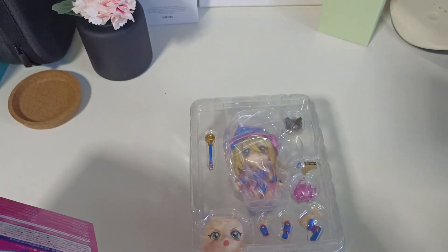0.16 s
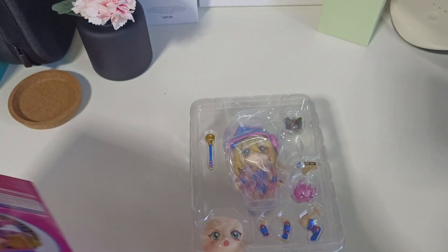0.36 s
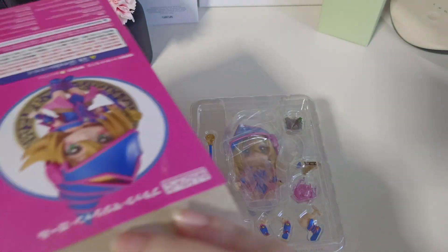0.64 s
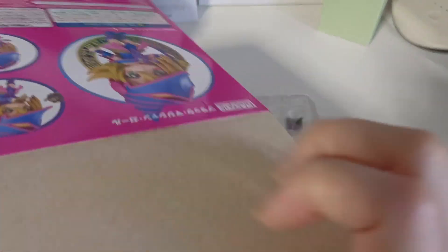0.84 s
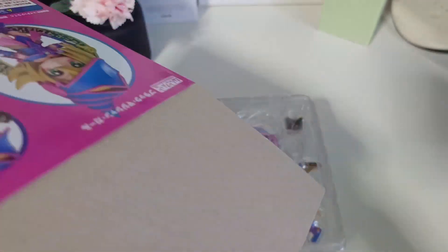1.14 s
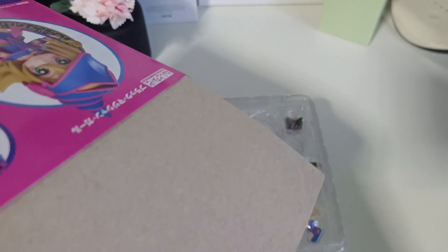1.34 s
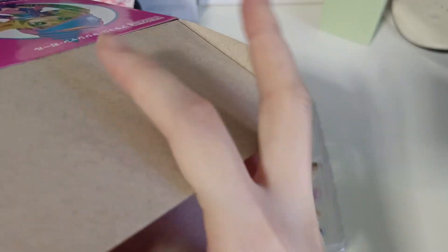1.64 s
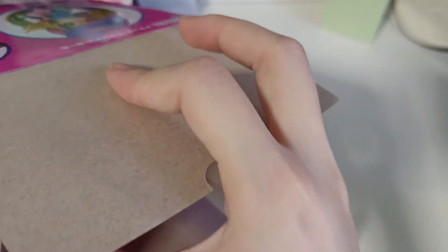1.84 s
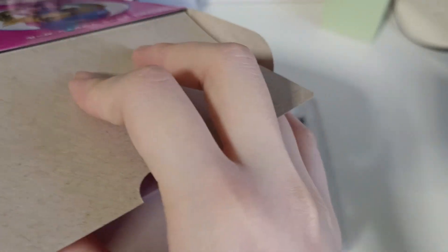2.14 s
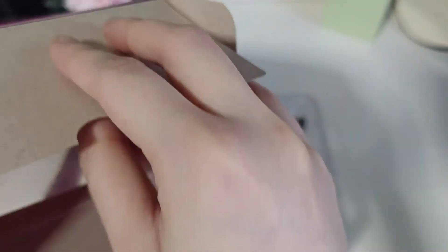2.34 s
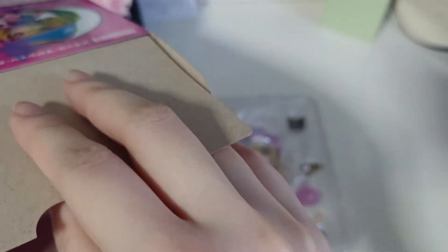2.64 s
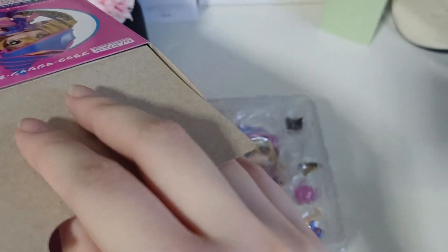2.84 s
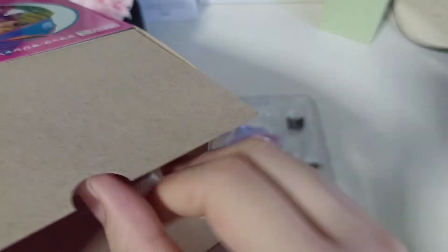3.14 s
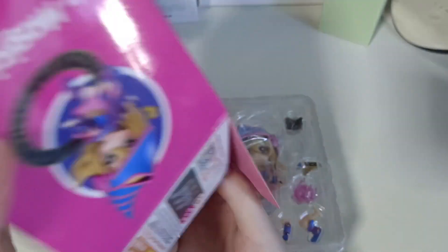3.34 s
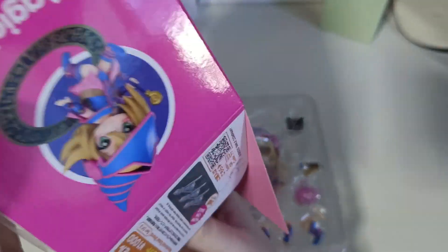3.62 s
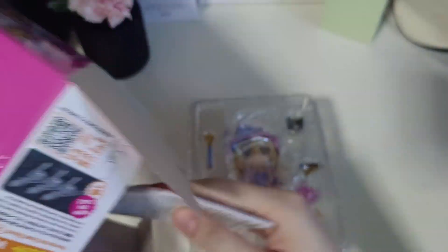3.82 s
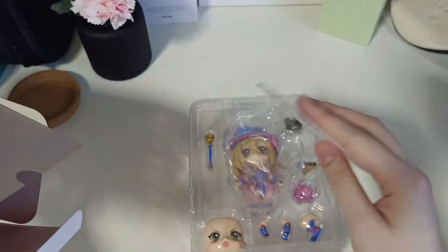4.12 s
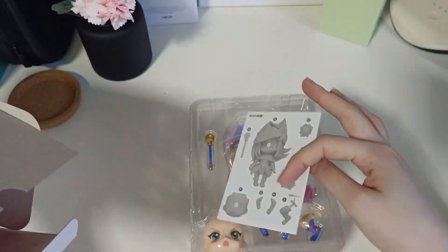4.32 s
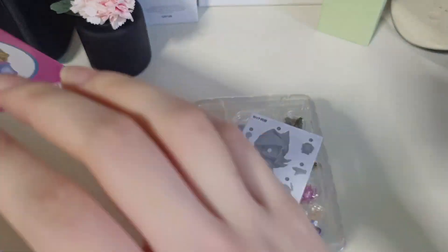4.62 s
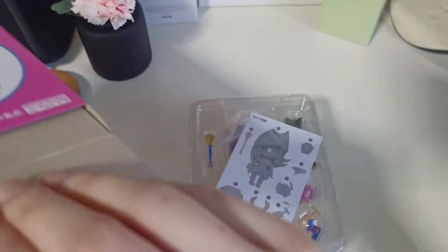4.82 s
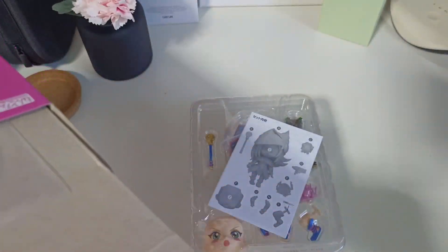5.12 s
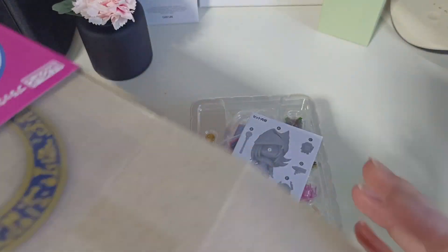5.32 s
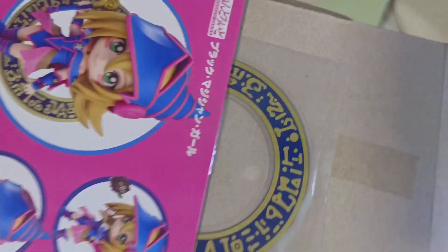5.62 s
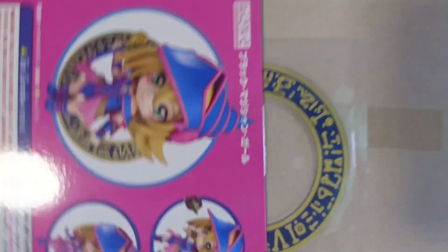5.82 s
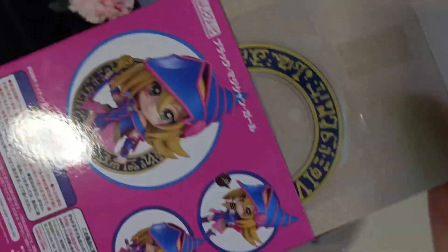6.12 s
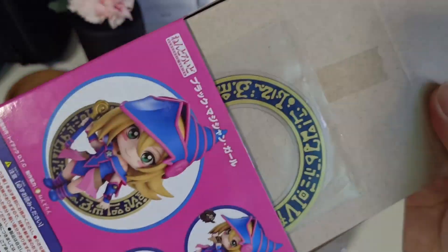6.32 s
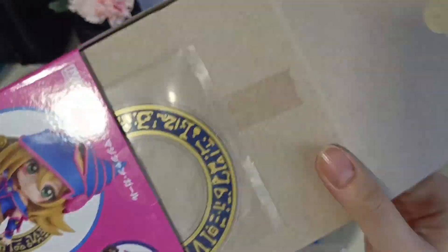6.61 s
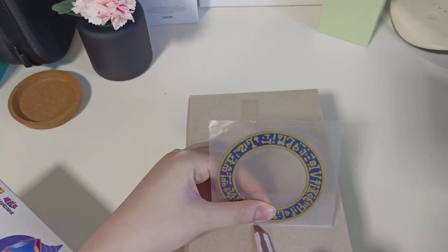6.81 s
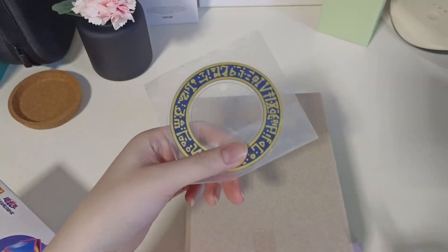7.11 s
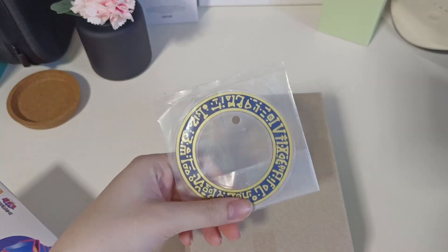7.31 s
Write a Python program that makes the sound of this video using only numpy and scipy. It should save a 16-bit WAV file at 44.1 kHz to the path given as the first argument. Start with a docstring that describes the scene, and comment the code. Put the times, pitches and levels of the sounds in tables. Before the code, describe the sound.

Very close stereo handling of a hollow cardboard box in a small, quiet room. From 0 to 0.9 s, fingers rub dry card at the right with a faint squeak, light swishes and dull boxy thumps. From 0.9 to 1.25 s, bright snaps and scuffs cluster tightly. Uneven scraping and juddering scuffs continue to 3 s, strongest near 2.7, then a hard snap at 3.03. A short squeak at 3.35 leads to a low bump at 3.55 and more rubbing, now in front, with squeaks near 3.8-4. It quietens; a sheet slaps flat at 4.47. A squeak at 4.7 precedes long scrapes and papery fizz to 5.15. Snaps and low thumps return at 5.55-5.85, with film swishing around 6.1 and a knock at 6.29. Sparse rubs, a snap at 6.94 and scuffs to 7.1 fade into soft room air and a barely audible high whine.

```python
"""Fingers and flaps scrape a hollow cardboard box as hands turn it over a desk: uneven slips excite the card.
Edges snap and scuff as short bursts that ring the card, and the box booms at each grip as a damped tone.
Paper and film fizz, sliding edges squeak as narrow noise, and a sheet slaps flat.
Behind them are low lumps of noise, soft room air and a faint high whine. The small room echoes quietly."""
import sys
import numpy as np
from scipy import signal
from scipy.fft import rfft, irfft, next_fast_len
from scipy.io import wavfile
from scipy.ndimage import uniform_filter1d, map_coordinates

SR = 44100
rng = np.random.default_rng(int(sys.argv[2]) if len(sys.argv) > 2 else 0)


def wav_out(sig):
    """Save sig, one row per channel (or a flat mono array), as 16-bit PCM at SR to the path in sys.argv[1]."""
    wavfile.write(sys.argv[1], SR, np.round(np.clip(np.atleast_2d(sig).T, -1, 1) * 32767).astype(np.int16))


N = 328986  # length in samples


def amp(db):
    """Turn a level in dB into a gain."""
    return 10 ** (np.asarray(db) / 20)


def unit(x):
    """Scale x to an rms of 1."""
    return x / np.sqrt(np.mean(x ** 2) + 1e-20)


def along(points, hz):
    """Read a table of (pitch_hz, value) at any pitch, on a log pitch axis."""
    f, value = np.transpose(points)
    return np.interp(np.log(hz + 1), np.log(f + 1), value)


def level_curve(rows):
    """Join (time_s, level_db) points into one level per sample."""
    time_s, level_db = np.transpose(rows)
    return np.interp(np.arange(N) / SR, time_s, level_db)


def wobble(rate):
    """Draw a smooth random curve through this many random points a second."""
    knots = rng.standard_normal(int(N * rate / SR) + 4)
    return map_coordinates(knots, [np.arange(N) * rate / SR])


def filtered(x, response):
    """Filter x by a response given as a function of frequency."""
    n = x.shape[-1]
    m = next_fast_len(n + 8192)  # room for the ringing to die away
    return irfft(rfft(x, m) * response(np.fft.rfftfreq(m, 1 / SR)), m)[..., :n]


def shaped(x, spectrum):
    """Give x a spectrum of (pitch_hz, level_db) points."""
    return filtered(x, lambda f: amp(along(spectrum, f)))


def ringing(modes, f):
    """Add up resonances, each a pitch that rings when pushed; their signs alternate."""
    total = 0
    for k, (hz, width, db) in enumerate(modes):
        total = total + (-1) ** k * amp(db) * 1j * f * width / (hz * hz - f * f + 1j * f * width)
    return total


def slips(per_second, spread_db, smooth):
    """Stick-slip: random catches of uneven size, mixed with a share of smooth noise."""
    caught = rng.random(N) < per_second / SR
    catch = caught * amp(spread_db * rng.exponential(size=N)) * rng.standard_normal(N)
    return np.sqrt(1 - smooth) * unit(catch) + np.sqrt(smooth) * rng.standard_normal(N)


def drifting(x, patchy_db):
    """The bending card shifts its strong frequencies from moment to moment."""
    z = signal.stft(x, nperseg=256)[2]
    patches = uniform_filter1d(rng.standard_normal(z.shape), 2, 0)  # blur over frequency
    patches = uniform_filter1d(patches, 10, 1)  # blur over time
    return signal.istft(z * amp(patchy_db * unit(patches)), nperseg=256)[1][:N]


def pressing(rows, hush_db=-11):
    """Gain of (start_s, length_s, level_db) strokes: each swells, holds, fades and leaves a faint touch."""
    power = np.zeros(N + SR)
    for start_s, length_s, db in rows:
        progress = np.linspace(0, 1, round(length_s * SR) + 400) ** 1.135  # builds slowly, stops short
        swell = np.clip(1.31 * np.sin(np.pi * progress), 0, 1)  # the top flattens into a hold
        power[round(start_s * SR):][:len(swell)] += amp(2 * db) * swell
    for s, *_ in SNAPS + SCUFFS:  # the edge sticks, hushing the rub, until it comes free
        power[round((s - .01) * SR):round(s * SR)] *= amp(hush_db)
    power = np.abs(uniform_filter1d(power, 60))
    trail = np.exp(-1 / (0.012 * SR))
    touch = signal.lfilter([1 - trail], [1, -trail], power)
    return np.sqrt(power + amp(-26.5) * touch)[:N]


# spells when the hands work at the right, else in front: start_s, end_s
AT_RIGHT = [(-1, 3.46), (4.64, 4.865), (5.17, 5.42)]


def at_right():
    """1 while the hands work at the right, 0 in front, with a short glide between."""
    t = np.arange(N) / SR
    return uniform_filter1d(sum(1. * (a < t) * (t < b) for a, b in AT_RIGHT), size=2000)


# colour of the room air: pitch_hz, level_db (relative)
AIR = [(40, -39), (70, -25), (170, -24), (260, -26.5), (450, -28.5), (800, -5), (1450, -12), (1800, -21.5),
       (4000, -36.5), (6000, -42), (12000, -87.5)]
# the faint whine, before its flicker: time_s, level_db
WHINE = [(6.3, -110), (6.6, -80), (7.46, -78)]


def background():
    """Room air as shaped noise, and a high sine whose pitch and level waver."""
    air = unit(shaped(rng.standard_normal((2, N)), AIR))
    whine_hz = 7250 + 30 * wobble(120)
    whine = np.sin(np.cumsum(2 * np.pi * whine_hz / SR)) * amp(5 * wobble(12) - 4)
    return amp(-49 + 0.73 * wobble(3.3)) * air + amp(level_curve(WHINE)) * whine


# air and desk rumble as the box swings: time_s, level_db (relative)
SWING = [(0.0, -45), (1.64, -29), (1.68, -41), (3.3, -53.5), (3.55, -39.5), (3.66, -84), (4.05, -38.5),
         (4.24, -80), (4.36, -31), (4.67, -60), (4.8, -30), (4.94, -56), (5.15, -39.5), (5.28, -62),
         (5.71, -22.5), (6.05, -52.5), (7.4, -48.5), (7.46, -29)]
# colour of the rumble: pitch_hz, level_db (relative)
RUMBLE = [(20, -31), (45, 7.5), (80, 26.5), (130, 24.5), (190, -98.5)]


def rumble():
    """Low lumps of moving air and desk shake, swelling at each grip, stronger at the right."""
    noise = rng.standard_normal((3, N))
    grips = uniform_filter1d(np.abs(thumps()), 2500)
    lumps = amp(level_curve(SWING) + 5.2 * wobble(14) - 4.0) + 0.13 * grips
    pair = (noise[0] + 0.7 * noise[1:]) * amp([[-2.5], [2.5]])  # one shared noise, one for each side
    return shaped(lumps * pair, RUMBLE) / np.std(shaped(pair, RUMBLE))


# light sweeps over glossy print, paper and film: start_s, length_s, level_db (before unevenness)
SWISHES = [(0.1, 0.028, -47), (0.228, 0.08, -40), (0.51, 0.035, -43), (0.6, .08, -50), (0.86, 0.064, -47),
           (1.22, 0.089, -49.5), (1.443, 0.14, -38.5), (2.228, 0.07, -45.5), (2.347, 0.027, -40.5),
           (3.8, 0.23, -40), (4.086, 0.047, -46), (4.15, 0.057, -49), (4.205, 0.023, -46),
           (4.255, 0.053, -44.5), (4.33, 0.02, -43.5), (4.897, 0.11, -38), (5.02, 0.11, -35),
           (5.253, 0.044, -42.5), (6.062, 0.21, -38.5), (6.645, 0.037, -43), (6.903, .032, -46.5),
           (7.26, 0.041, -57), (7.392, 0.13, -59),]
# colour of the fizz, also heard in rubs on bare card: pitch_hz, level_db (relative)
FIZZ = [(1500, -2), (4000, 1), (6000, -2.5), (8000, -12), (10000, -20.5), (11500, -12), (13500, -22),
        (16000, -27)]


def swishes(uneven_db):
    """Light sweeps over smooth sheets make many tiny catches, heard as fizz."""
    sweep = drifting(slips(6600, spread_db=0.5, smooth=0.7), patchy_db=3.5)
    return pressing(SWISHES, hush_db=0) * amp(0.41 * uneven_db) * unit(shaped(sweep, FIZZ))


# an edge sings as it slides: start_s, length_s, level_db, from_hz, to_hz
SQUEAKS = [(0.103, .075, -37, 3500, 2450), (0.121, .11, -34.5, 522, 782), (3.355, 0.041, -24.5, 2626, 2550),
           (3.796, 0.096, -30.5, 2030, 2140), (3.895, .1, -25, 2585, 2934), (4.695, 0.044, -24, 2460, 2555),
           (7.092, 0.0258, -27, 1100, 1367), (7.24, 0.011, -45, 2750, 2720)]


def squeaks():
    """Gliding tones whose size and phase wander so fast that each is heard as a narrow noise."""
    t = np.arange(N) / SR
    a, b = wobble(460), wobble(460)  # a faster wobble makes a wider band
    out = np.zeros(N)
    for start_s, length_s, db, from_hz, to_hz in SQUEAKS:
        hz = np.interp(t, [start_s, start_s + length_s], [from_hz, to_hz])
        phase = np.cumsum(2 * np.pi * hz / SR)
        band = unit(a * np.cos(phase) + b * np.sin(phase))
        out += pressing([(start_s, length_s, db)], hush_db=0) * band
    return out


# how heavily the hands bear on the card: time_s, drag_db (added to the rub's own level)
WEIGHT = [(0, 8), (.12, -14.5), (.45, 9), (.8, 0.5), (1.1, 11.5), (1.5, -9.5), (1.8, 14.5), (2.07, -6),
          (2.2, 3), (3.3, 2.5), (3.55, 3), (3.85, 0.5), (4.4, 11), (4.8, 4), (4.95, -3.5), (5.5, 4.5),
          (6.5, 6.5), (6.7, -9.5), (7.1, 7.5)]


def dragging():
    """Gain of the rubs' low drag: more under a heavy hand and in short slips."""
    rows = []
    for start_s, length_s, db in RUBS:
        weight_db = np.interp(start_s, *np.transpose(WEIGHT))
        short_db = 2.5 * np.log2(0.044 / length_s)  # half the length digs in 2.5 dB more
        rows.append((start_s, length_s, db + weight_db + short_db))
    return pressing(rows)


# resonances of the hollow in the box: pitch_hz, width_hz, level_db (relative)
HOLLOW = [(238.9, 43, 4), (312, 115.6, -2), (542, 74, -7.5)]


def hollow():
    """Every rub also shakes the air inside the box, which is never quite still in the hands."""
    shake = 0.14 * pressing(RUBS) + 0.86 * dragging()
    push = (shake * amp(3.1 * wobble(30)) + amp(-39.5)) * slips(600, spread_db=-4.5, smooth=0.28)
    inside = lambda f: ringing(HOLLOW, f) * f ** 2 / (f ** 2 + 170 ** 2) / (1 + 1j * f / 2500) ** 2
    return amp(18.5) * filtered(push, inside)


# grips and knocks on the box: start_s, level_db (relative), pitch_hz (wanders), held_s until fingers damp it
THUMPS = [(0.037, -14.5, 254, 0.01), (0.34, -25, 288, 0.032), (0.475, -22, 329.4, 0.033),
          (0.584, -21.5, 286, 0.033), (0.842, -17, 263, 0.017), (0.982, -18.5, 286, 0.011),
          (1.096, -19, 258, 0.015), (1.129, -16.5, 276.4, 0.091), (1.179, -17, 267, 0.085),
          (1.309, -17, 281, 0.013), (1.465, -18, 248, 0.019), (1.51, -20.5, 231, 0.027),
          (1.603, -15.5, 262.6, 0.056), (1.682, -20, 361, 0.02), (1.972, -20.5, 280, 0.025),
          (2.274, -33, 266, 0.048), (2.38, -25, 270, 0.013), (2.435, -27.5, 275, 0.014),
          (2.471, -27, 272, 0.022), (3.003, -22, 264, 0.01), (3.043, -25, 300, 0.017),
          (3.415, -19.5, 224, 0.027), (3.551, -14.5, 226, 0.054), (3.912, -25.5, 273, .014),
          (3.994, -26, 407, 0.035), (4.485, -23.5, 343, 0.019), (4.789, -17, 257.6, 0.081),
          (5.133, -21, 255, 0.044), (5.676, -21, 255, 0.008), (5.712, -17, 224, 0.05),
          (5.813, -21, 249, 0.0089), (5.871, -25.5, 120, 0.025), (6.057, -21, 259, 0.022),
          (6.135, -24.5, 246, 0.015), (6.232, -22.5, 545, .022), (6.287, -14.5, 271, 0.039),
          (6.651, -22, 268.7, 0.025)]


def thumps():
    """A soft push swells quickly and the hollow dies away, its pitch wandering."""
    out, t = np.zeros(N + SR), np.arange(8000) / SR
    after_grip = 0.23  # closing fingers damp the boom to this share
    for s, db, hz, held_s in THUMPS:
        drift = 15 * np.cumsum(rng.standard_normal(len(t))) / np.sqrt(SR)
        ring = np.sin(2 * np.pi * hz * t + drift)
        ring *= (1 - np.exp(-t / 0.0022)) * amp(-60 * t / 0.19)
        ring *= after_grip + (1 - after_grip) / (1 + (t / held_s) ** 8)
        out[round(s * SR):][:len(t)] += amp(db + 6.0) * ring / np.abs(ring).max()
    # the thumps keep to a narrow band, with little deep bass and little treble
    return filtered(out[:N], lambda f: (1j * f / (90 + 1j * f) / (1 + 1j * f / 990)) ** 2)


# resonances of the card panels: pitch_hz, width_hz, level_db (relative)
CARD = [(709, 50, 0), (1088, 159, 9), (1730, 185, 8.5), (2200, 373, 10), (2800, 243, 6.5), (3133, 185, 10),
        (3640, 1520, -8)]
# a free flap rings on faintly: pitch_hz, width_hz, level_db (relative)
LINGER = [(1690, 24, 6.5)]
TURNED = 0.897  # held in front, the box shows larger panels, pitched this share


def contacts(rows, shape, crack, chatter, width, bright, card):
    """Each touch rings its own spot; with card=1 it also rings the panels and knocks the hollow."""
    out, t, right = np.zeros(N + SR), np.arange(4096) / SR, at_right()
    for s, db, hz in rows:
        judder = chatter * np.sin(2 * np.pi * hz * t)
        push = shape * (rng.standard_normal(len(t)) + judder) + crack * (t == 0)
        spot = [(hz, width * hz, 0), (5000, 6000, -14)]
        edge_hz = bright * hz * amp(0.77 * db)  # harder contacts are brighter
        pitch = 1 if right[round(s * SR)] > .5 else TURNED

        def response(f):
            panels = .5 + card * (ringing(CARD, f / pitch) + ringing(LINGER, f))
            touched = ringing(spot, f) * panels / (1 + 1j * f / edge_hz) ** 2
            return touched + card * ringing(HOLLOW, f)

        ring = filtered(push, response)
        out[round(s * SR):][:len(t)] += amp(db) * ring / np.abs(ring).max()
    return out[:N]


def rattle():
    """Outline of the short rattle after a snap, falling 60 dB in 10 ms."""
    return 0.12 * amp(-60 * np.arange(4096) / SR / 0.01)


# the sheet slaps flat on the tray: start_s, level_db (peak, before placing), pitch_hz of the spot
PAPER = [(4.4735, 5.5, 1740)]


def paper_slap():
    """A sharp push and a short rattle, without the card or the hollow."""
    return contacts(PAPER, rattle(), crack=1, chatter=0, width=0.9, bright=2.2, card=0)


# an edge catches and drags free: start_s, level_db (peak, before placing), pitch_hz of the spot
SCUFFS = [(0.579, -17.5, 1130), (0.91, -12, 2650), (0.916, -6.5, 2595), (0.975, -12, 2600),
          (1.033, -10.5, 2770), (1.055, -12, 2390), (1.08, -7, 2350), (1.108, -14, 2430),
          (1.173, -11, 2364), (1.422, -13, 1110), (1.603, -9, 2800), (1.663, -11.5, 2700),
          (1.793, -17, 2200), (1.961, -8.5, 1127), (2.147, -12, 1130), (2.193, -12.5, 3120),
          (2.304, -14, 1160), (2.382, -14.5, 2750), (2.425, -7.5, 2080), (2.438, -13, 1083),
          (2.532, -17.5, 2130), (2.569, -11, 1117), (2.68, -4, 1730), (2.819, -9, 1150), (2.84, -6.5, 1743),
          (2.873, -9.5, 1690), (2.888, -16, 1647), (3.006, -13, 1047), (3.112, -22, 3060),
          (3.168, -15.5, 1690), (3.258, -14, 1690), (3.323, -13.5, 1107), (3.471, -15.5, 1607),
          (3.59, -14, 2950), (3.911, -14, 2640), (3.937, -17, 2670), (4.699, -11, 2300),
          (4.726, -11.5, 2430), (4.787, -13, 2050), (5.535, -13.5, 807), (6.038, -12, 1360),
          (6.257, -21, 2760), (6.74, -20, 1213), (6.988, -7.5, 1230), (7.03, -15.5, 1310),
          (7.092, -16.5, 1120), (7.109, -12, 1205)]


def scuffs():
    """A short swelling burst of noise that judders at the spot's own pitch, with a faint tail."""
    t, rise_s = np.arange(4096) / SR, 0.0042
    swell = (t / rise_s) ** 0.92 * np.exp(-(t / rise_s) ** 2)
    tail = 0.12 * (t > rise_s) * amp(-60 * t / 0.067)
    return contacts(SCUFFS, swell + tail, crack=0, chatter=0.37, width=0.6, bright=4, card=1)


# clean snaps of edges and flaps: start_s, level_db (peak, before placing), pitch_hz of the spot
SNAPS = [(0.475, -10, 945), (0.956, -3, 2050), (0.99, -5.5, 1720), (1.127, -8, 2310), (1.205, -12, 2430),
         (1.225, -14.5, 2600), (3.034, -1.5, 1610), (3.042, -12.5, 2450), (5.574, -12, 690),
         (5.619, -14.5, 1480), (5.711, -11, 1560), (5.814, -12, 1310), (5.841, -12, 1150),
         (6.938, -9, 1810)]


def snaps():
    """A single sharp push and a short rattle ring the panels and the hollow."""
    return contacts(SNAPS, rattle(), crack=1, chatter=0, width=1.1, bright=7, card=1)


# slips of a finger or flap over the card: start_s, length_s, level_db (before unevenness)
RUBS = [(0.002, 0.034, -29.5), (0.053, 0.18, -37), (0.096, 0.083, -23.5), (0.217, 0.0029, -26.5),
        (0.23, 0.15, -37.5), (0.308, 0.012, -27.5), (0.332, 0.059, -37.5), (0.463, 0.055, -36.5),
        (0.505, 0.24, -34.5), (0.763, 0.26, -32.5), (0.93, 0.062, -31), (1.03, 0.11, -30),
        (1.182, 0.11, -34.5), (1.3, 0.031, -28), (1.337, 0.044, -35), (1.381, 0.048, -25.5),
        (1.41, 0.13, -33.5), (1.539, 0.076, -24.5), (1.641, 0.057, -29), (1.721, 0.27, -31),
        (2.069, 0.095, -27), (2.17, 0.028, -27.5), (2.252, 0.069, -34.5), (2.34, 0.053, -27),
        (2.406, 0.18, -26), (2.811, 0.081, -31.5), (3.044, 0.04, -31), (3.071, 0.1, -40.5),
        (3.249, 0.032, -33.5), (3.288, 0.13, -32), (3.376, 0.047, -27), (3.528, 0.071, -33),
        (3.563, 0.14, -41), (3.657, 0.035, -26), (3.673, 0.2, -31.5), (3.776, 0.12, -32.5),
        (3.894, 0.12, -26), (4.274, 0.015, -44.5), (4.323, 0.043, -36), (4.475, 0.044, -42.5),
        (4.699, 0.024, -30.5), (4.783, 0.074, -27), (4.871, 0.15, -24), (4.993, 0.15, -23),
        (5.251, 0.047, -26), (5.299, 0.5, -41), (5.457, 0.12, -30), (5.555, 0.089, -34.5),
        (5.654, 0.034, -37), (5.805, 0.042, -34), (5.819, 0.17, -44), (6.009, 0.07, -27.5),
        (6.049, 0.29, -36.5), (6.231, 0.031, -27.5), (6.278, 0.028, -35.5), (6.361, 0.041, -42.5),
        (6.497, 0.038, -42.5), (6.61, 0.043, -39.5), (6.645, 0.03, -22.5), (6.758, 0.093, -30.5),
        (6.896, 0.057, -29), (6.964, 0.036, -27.5), (7.014, 0.044, -34.5), (7.101, 0.02, -34.5)]
# colour of the scrape: pitch_hz, level_db (relative)
SCRAPE = [(1100, -24.5), (1600, -7.5), (2800, 0), (4000, -8), (6000, -23.5), (9000, -76.5)]
# colour of the low drag: pitch_hz, level_db (relative)
DRAG = [(400, -0.5), (600, 10), (1100, 8), (1500, 1.5), (2000, -59.5)]


def strokes():
    """Fingers and flaps slip over the card; the same slips feed panels and surface."""
    rub = drifting(slips(2500, spread_db=2.0, smooth=0.4), patchy_db=4.0)
    rub += amp(-17.5) * slips(190, spread_db=2.5, smooth=0)  # about 190 faint random ticks a second roughen it
    uneven_db = 1.68 * wobble(40) + 1.4 * wobble(110)  # pressure jitters along the stroke
    right = at_right()

    def panels(colour):
        poses = lambda f: np.array([0.47 + ringing(CARD, f), 0.74 + ringing(CARD, f / TURNED)])
        side, front = filtered(rub, lambda f: amp(along(colour, f)) * poses(f))
        return unit(side * right + front * (1 - right))

    scrape = pressing(RUBS) * amp(uneven_db - 2.5) * panels(SCRAPE)
    drag = dragging() * amp(5.2 * wobble(45) - 7.5) * panels(DRAG)
    fizz = pressing(RUBS) * amp(1.7 * uneven_db - 21.5) * unit(shaped(rub, FIZZ))
    return scrape + drag + fizz + swishes(uneven_db)


# left side compared with right, sound at the right: pitch_hz, level_db
TILT_RIGHT = [(60, -6), (200, -4), (700, -5.5), (2400, -3.5), (5000, -6), (15000, -15)]
# left side compared with right, sound in front: pitch_hz, level_db
TILT_FRONT = [(60, -1), (700, -1), (2400, -1), (5000, -3), (15000, -8)]


def stereo(x):
    """Sound from the right reaches the left side later and duller."""
    def pair(part, tilt, lag_s):
        left = lambda f: amp(along(tilt, f) / 2) * np.exp(-2j * np.pi * f * lag_s)
        return filtered(part, lambda f: np.array([left(f), amp(-along(tilt, f) / 2)]))

    right = at_right()
    return pair(right * x, TILT_RIGHT, 12 / 44100) + pair((1 - right) * x, TILT_FRONT, 0)


def echoes(pair, decay, step=8192):
    """Surfaces answer each side with fading noise, drawn anew every step samples as the box moves."""
    out = np.zeros((2, N + SR))
    for start in range(0, N, step):
        hz, t, z = signal.stft(rng.standard_normal((2, SR // 5)), SR, nperseg=128)
        fade = amp(-60 * t / along(decay, hz)[:, None])
        tail = signal.istft(z * fade, SR, nperseg=128)[1]
        wet = signal.fftconvolve(pair[:, start:start + step], tail / np.linalg.norm(tail[0]), axes=1)
        out[:, start + 30:][:, :wet.shape[1]] += wet
    return out[:, :N]


# scatter off desk and hands: pitch_hz, decay_s (time to fall 60 dB)
DESK = [(200, 0.046), (10000, 0.002)]
# echo of the room: pitch_hz, decay_s (time to fall 60 dB)
ROOM = [(200, 0.16), (2000, 0.13), (10000, 0.031)]


def scene():
    """The box close by, with desk, room, rumble and background."""
    rubbed = stereo(strokes() + squeaks() + thumps() + hollow())
    struck = stereo(snaps() + scuffs() + paper_slap())
    # a second, independent layer of the same rubs, opposite in sign on the two sides, widens the sound
    wide_rubs = stereo(strokes()) * [[1], [-1]]
    scattered = rubbed + amp(-4.5) * struck  # edges face the listener and scatter less
    small = filtered(scattered, lambda f: (1j * f / (500 + 1j * f)) ** 2)  # near things scatter short waves
    near = rubbed + struck + amp(-3.0) * wide_rubs + amp(-2.0) * echoes(small, DESK)
    return near + amp(-9.0) * echoes(scattered, ROOM) + rumble() + background()


def record(dry):
    """Round off the loudest peaks near full scale, then remove everything from 15850 Hz up."""
    full = dry / (1 + np.abs(dry) ** 8) ** (1 / 8)
    return filtered(full, lambda hz: hz < 15850)


dry = scene()
out = record(dry)
wav_out(out)
```